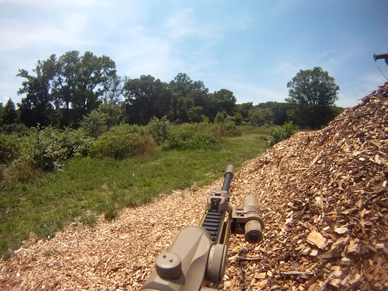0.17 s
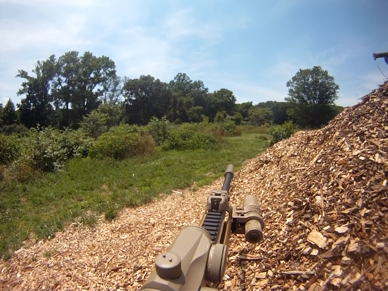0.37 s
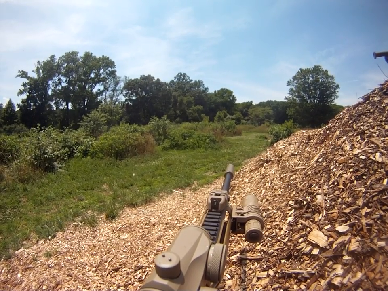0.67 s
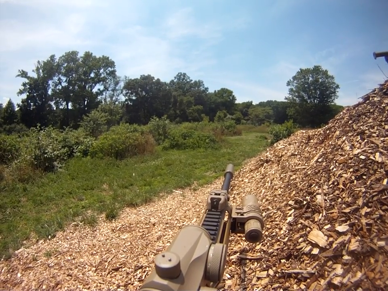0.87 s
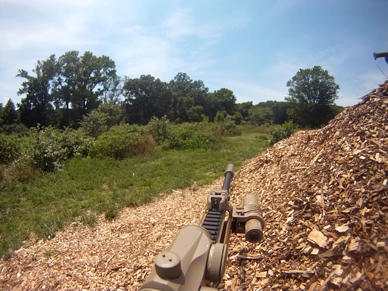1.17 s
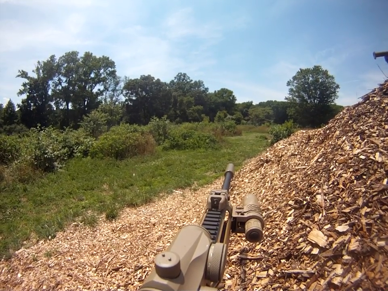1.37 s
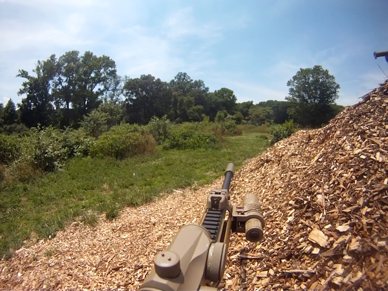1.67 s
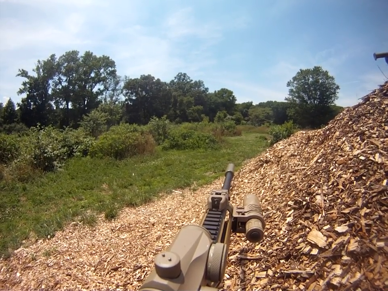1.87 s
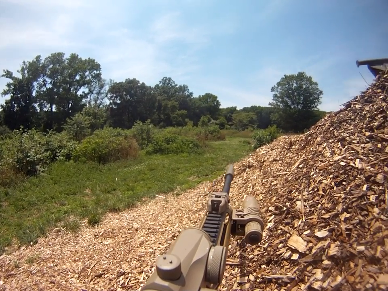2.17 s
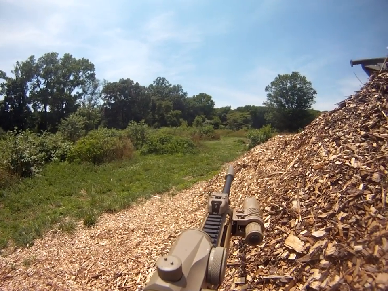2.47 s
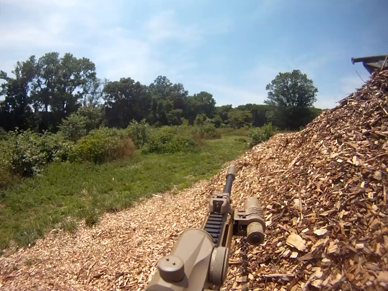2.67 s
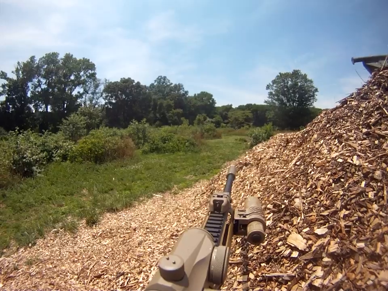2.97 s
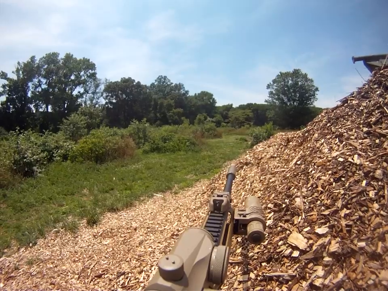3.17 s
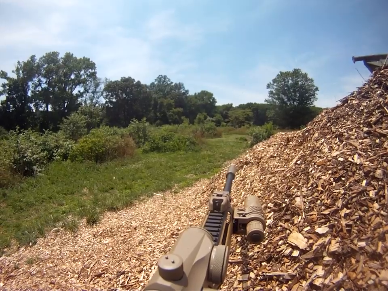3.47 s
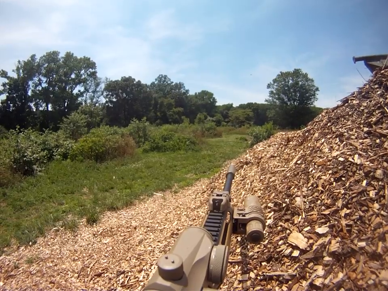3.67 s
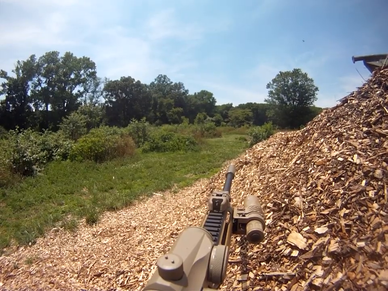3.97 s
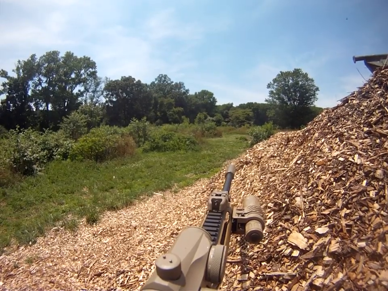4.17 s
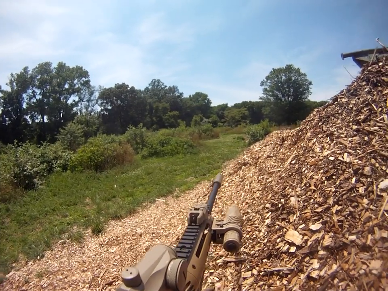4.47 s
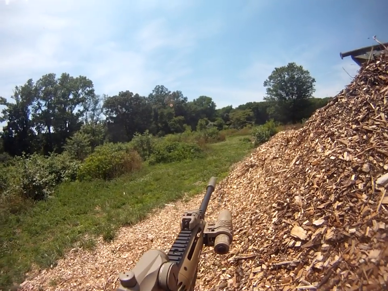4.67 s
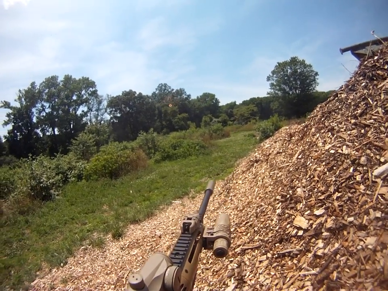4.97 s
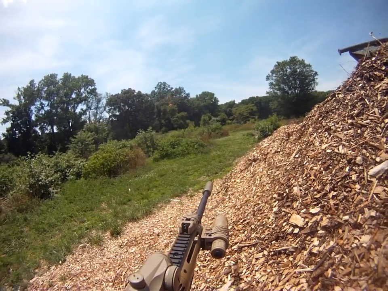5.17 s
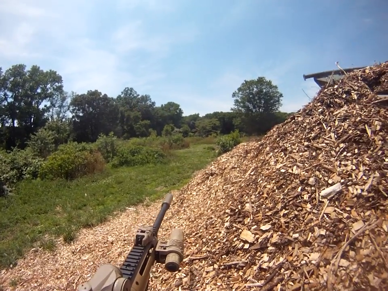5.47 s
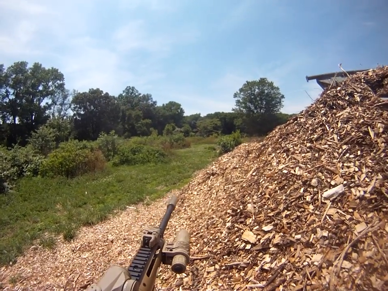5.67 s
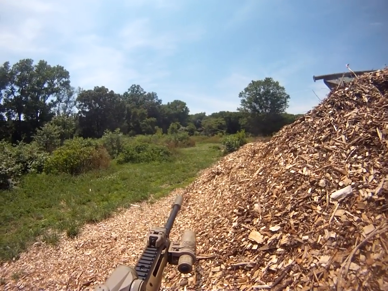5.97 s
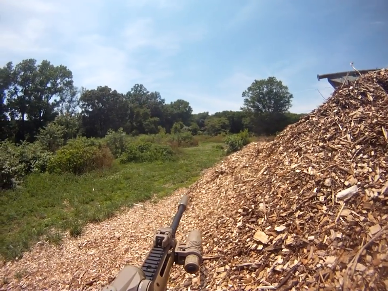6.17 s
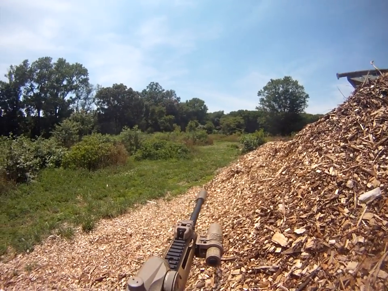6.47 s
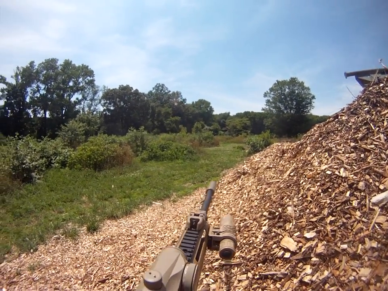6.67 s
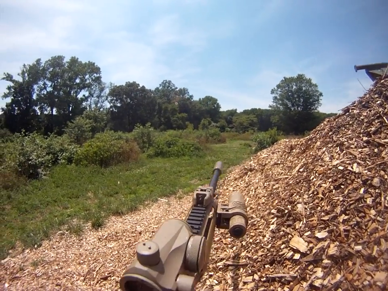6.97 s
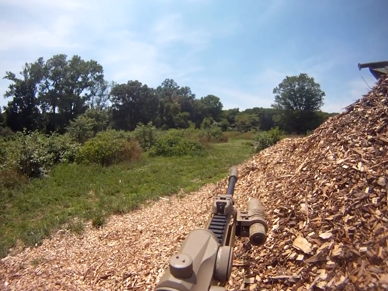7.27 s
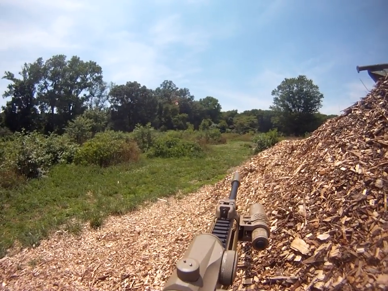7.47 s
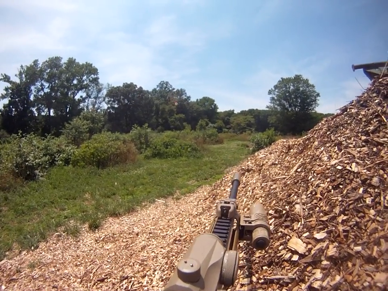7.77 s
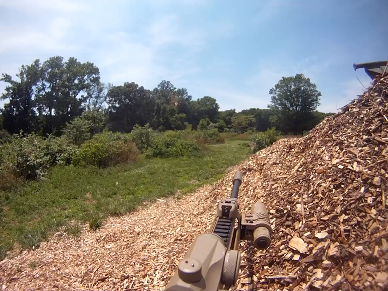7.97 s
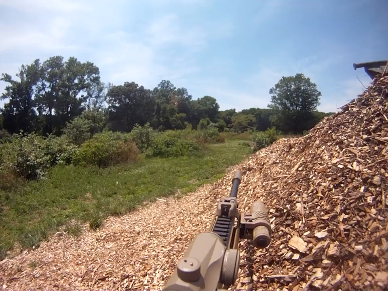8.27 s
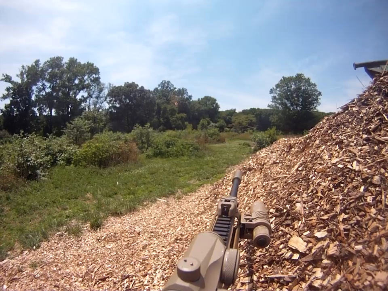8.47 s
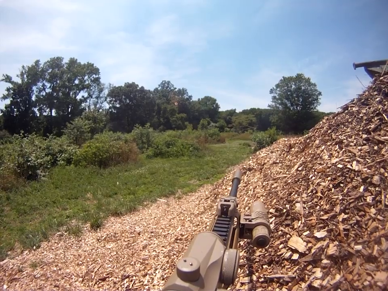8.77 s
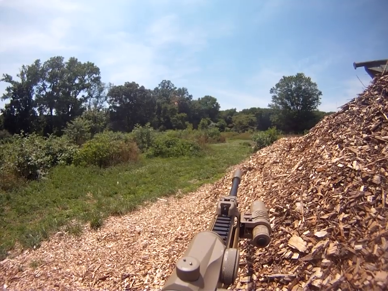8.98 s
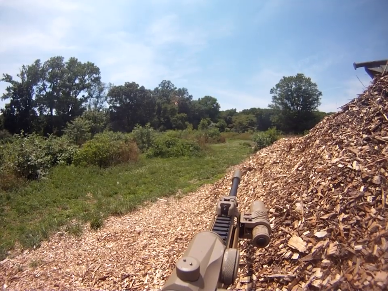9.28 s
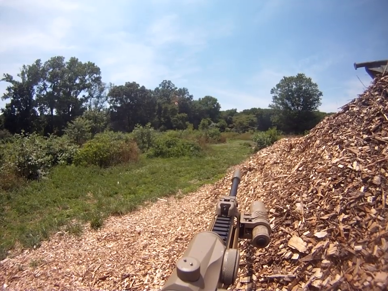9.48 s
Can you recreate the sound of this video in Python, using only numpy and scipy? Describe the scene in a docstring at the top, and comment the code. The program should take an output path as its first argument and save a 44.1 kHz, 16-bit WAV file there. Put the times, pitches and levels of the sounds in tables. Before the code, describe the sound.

Outdoors in a field beside a wood-chip bank, a microphone mounted on an airsoft rifle catches its loud, metallic three-shot bursts, very close and dry. Small clicks and a faint bird fill the gaps. Midway, another gun snaps in a long slowing burst while a farther one pops rapidly; later two nearby guns whirr and rattle one after the other, overlapped by more rifle bursts.

```python
"""An airsoft rifle with a camera on its rail fires short bursts over a field, 19 shots a second.
Each shot is a gearbox cycle: ringing modes and scraping noise, a slam pulse and a softer recoil bump.
Other guns, built from coloured noise puffs and rings, fire long bursts; two of them whirr close by.
Clicks, dull knocks and faint echoes join them over low air rumble, a background noise whose level
rises and falls, and a bird of swept sine notes."""
import sys
import numpy as np
from scipy import signal
from scipy.fft import rfft, irfft, next_fast_len
from scipy.io import wavfile
from scipy.ndimage import map_coordinates

SR = 44100
rng = np.random.default_rng(int(sys.argv[2]) if len(sys.argv) > 2 else 0)


def bounce(signal):
    """Save signal as a 16-bit WAV file at the path given by the first command-line argument."""
    frames = np.transpose(np.atleast_2d(signal))
    limited = np.clip(frames, -1, 1)
    pcm = np.round(limited * 32767).astype(np.int16)
    wavfile.write(sys.argv[1], SR, pcm)


N = 423801
BLOW_T = np.arange(SR // 16) / SR  # time within one blow, s

# Colour of a dull knock, also of a shuddering shell: f/Hz, relative level/dB
KNOCK_COLOUR = [(60, -18), (250, -8), (380, -1.5), (560, -2.5), (800, -13.5), (3000, -29.5)]
# Colour of a close gun's pop: f/Hz, relative level/dB
NEAR_POP_COLOUR = [(40, -19), (120, 0.5), (350, -10), (600, -2.5), (1000, -1), (1350, -3), (1600, -9),
                   (2400, -4), (3200, 1), (3800, -16), (6000, -22.5)]
# Colour of gear noise and latch clicks: f/Hz, relative level/dB
GEAR_COLOUR = [(100, -17), (300, -14.5), (600, -12), (900, -11), (1450, -12.5), (1950, -3), (2400, -3),
               (2700, -5), (3150, 2.5), (3800, -8), (4400, -10), (5100, -5.5), (5900, -14), (8000, -28)]


def amp(db):
    """Decibels to gain."""
    return 10 ** (np.asarray(db) / 20)


def unit(x):
    """Scale to rms 1."""
    return x / np.sqrt(np.mean(x ** 2) + 1e-20)


def gain(points, hz):
    """Gain at hz, drawn through (f/Hz, level/dB) points on a log frequency axis."""
    f, db = np.transpose(points)
    return amp(np.interp(np.log(hz + 1), np.log(f), db))


def wobble(rate):
    """A smooth random curve with rate knots a second."""
    knots = rng.standard_normal(int(N * rate / SR) + 4)
    return map_coordinates(knots, [np.arange(N) * rate / SR])


def filtered(x, response):
    """Filter x with a response given as a function of frequency."""
    size = next_fast_len(len(x) + SR // 4)
    spectrum = rfft(x, size) * response(np.fft.rfftfreq(size, 1 / SR))
    return irfft(spectrum, size)[:len(x)]


def noise(colour):
    """Steady coloured noise of rms 1."""
    return unit(filtered(rng.standard_normal(N), lambda hz: gain(colour, hz)))


def pulse(colour, size=2048):
    """A minimum-phase pulse of this colour: it starts at once and peaks at 1."""
    cepstrum = irfft(np.log(gain(colour, np.fft.rfftfreq(size, 1 / SR))))
    # Folding the cepstrum forward in time makes the pulse causal
    fold = np.r_[1, np.full(size // 2 - 1, 2), 1, np.zeros(size // 2 - 1)]
    shape = irfft(np.exp(rfft(cepstrum * fold)))
    return shape / np.abs(shape).max()


def ring(modes):
    """Damped sine modes of a struck body, one a row."""
    hz, db, t60 = np.transpose(modes)[:, :, None]
    return amp(db - 60 * BLOW_T / t60) * np.sin(2 * np.pi * hz * BLOW_T)


def struck(modes, count, scatter_db):
    """Sum the modes at new random strengths for every blow, one blow a row."""
    strengths = amp(scatter_db * rng.standard_normal((count, len(modes))))
    return strengths @ modes


def puffs(colour, t60, count, alike):
    """Dying noise bursts that start near rms 1, one a row; the share alike repeats in each."""
    fade = amp(-60 * BLOW_T / t60)
    white = rng.standard_normal((count + 1, len(BLOW_T)))
    white = np.sqrt(alike) * white[0] + np.sqrt(1 - alike) * white[1:]
    bursts = signal.fftconvolve(white * fade, colour[None], axes=1)[:, :len(BLOW_T)]
    return bursts * np.linalg.norm(fade) / np.linalg.norm(bursts, axis=1, keepdims=True)


def add(track, s, sound):
    """Mix a sound into the track at time s; it may begin before the track does."""
    start = round(s * SR)
    sound = sound[max(-start, 0):]
    part = track[max(start, 0):][:len(sound)]
    part += sound[:len(part)]


def noise_hits(events, colour, contacts):
    """Each event is a few quick contacts, each a dying puff of noise in the given colour."""
    out, shape = np.zeros(N), pulse(colour)
    for delay, contact_db, t60 in contacts:  # t/s, level/dB, t60/s
        hits = puffs(shape, t60, len(events), alike=0.42)
        for (s, db), hit in zip(events, hits):
            add(out, s + delay, amp(db + contact_db) * hit)
    return out


def burst(first, period, db, spin_up_s, count):
    """Shot times and levels: a motor's starting lag shrinks until the pace is even."""
    lag_left = .19  # share of the lag still to come after each shot
    scatter_db = .7  # shots are unequally loud
    k = np.arange(count)
    times = first + period * k + spin_up_s * (1 - lag_left ** k)
    return times, db + scatter_db * rng.standard_normal(count)


def gears(times, lead_s, run_on_s, db):
    """Gritty gear noise that rises with a burst, labours once a shot and coasts down after it."""
    rise_db_per_s, fall_db_per_s = 230, 220
    load_db, hardest_at = 1.6, .72  # swing each way; share of the cycle where the load peaks
    t = np.arange(N) / SR
    early = np.maximum(times[0] - lead_s - t, 0)
    late = np.maximum(t - times[-1] - run_on_s, 0)
    cycle = np.interp(t, times, np.arange(len(times)))
    load = np.cos(2 * np.pi * (cycle - hardest_at))  # gears labour as the spring winds
    level_db = db + load_db * load - rise_db_per_s * early - fall_db_per_s * late
    grit_db = 1.3 * wobble(170) + 1.4 * wobble(700)
    return amp(level_db + grit_db) * noise(GEAR_COLOUR)


def rifle():
    """The piston clatters through the receiver, slams home, and the gun bumps while its spring rings."""
    # Trigger pulls: start of the first stroke t/s, delay of the first slam t/s
    pulls = [(-.031, .0078), (.7141, .0077), (1.2128, .0076), (2.5947, .0026), (3.3969, .0078),
             (7.823, .0027), (8.6012, .0076), (9.586, .0076)]
    # Contacts of one cycle: nominal t/ms after the stroke starts, receiver level/dB, spring level/dB,
    # scrape level/dB before its trim, scrape t60/ms
    cycle = [(-3, -9, -20.5, -12.5, 9), (0, -1.5, -5, 1, 16), (1.91, -5.5, -4, -3, 16),
             (4, -5, -19.5, -5, 6.7), (6.5, -6, -19.5, -6, 36), (11.5, -12, -16.5, -10, 37),
             (20.5, -29, -16, -18, 22), (22.5, -36.5, -14.5, -16.5, 67), (26, -19, -18.5, -15.5, 16),
             (33, -29.5, -13, -15, 84), (34.5, -28.5, -16.5, -18, 60), (39.5, -31, -21, -21.5, 45)]
    # Receiver modes: f/Hz, level/dB, t60/s
    receiver_modes = [(165, -22, 0.057), (224, -14.5, 0.051), (290, -21, 0.026), (426.6, -20, 0.054),
                      (568, -14, 0.063), (860, -14, 0.028), (1243, -15.5, 0.027), (1601, -16.5, 0.02),
                      (1839, -15, 0.02), (2297, -17.5, 0.024)]
    # Spring modes: f/Hz, level/dB, t60/s
    spring_modes = [(2698, -14, 0.023), (2864, -8, 0.023), (2942, -17.5, 0.05), (3170, -22, .02),
                    (3816, -21, 0.013), (4350, -22.5, .02), (5037, -19.5, .025)]
    # Colour of the scraping contacts: f/Hz, relative level/dB
    scrape_colour = [(30, -22.5), (150, -7.5), (600, -3.5), (1500, 1.5), (2600, -4.5), (4000, -4.5),
                     (5500, -10)]
    # Colour of the piston slam: f/Hz, relative level/dB
    slam_colour = [(20, -15.5), (120, -13), (300, -1), (500, 8.5), (750, -6.5), (1300, 0), (1950, 3),
                   (2800, -8), (4500, -15), (9000, -21.5)]
    # Colour of the recoil bump: f/Hz, relative level/dB
    bump_colour = [(20, -20.5), (100, -4.5), (250, -3), (430, 1), (700, -6), (1200, -11.5), (2500, -30.5),
                   (8000, -63.5)]
    cycle_s = .0524  # from shot to shot
    slam_s = .0078  # from stroke to slam once the gearbox is running
    first_db, next_db = 1.4, .45  # a burst opens with its hardest shot
    shots = [(s + k * cycle_s, slam_s if k else first_slam, next_db if k else first_db)
             for s, first_slam in pulls for k in range(3)]
    count, stroke = len(shots), np.transpose(shots)[1]
    receiver, spring = ring(receiver_modes), ring(spring_modes)
    scrape, slam, bump = pulse(scrape_colour), pulse(slam_colour), pulse(bump_colour)
    out = np.zeros(N)
    for ms, receiver_db, spring_db, scrape_db, scrape_ms in cycle:
        blows = amp(receiver_db) * struck(receiver, count, scatter_db=3.0)
        blows += amp(spring_db) * struck(spring, count, scatter_db=2.5)
        blows += amp(scrape_db - 13.0) * puffs(scrape, scrape_ms / 1000, count, alike=0.68)
        blows *= 1 - np.exp(-BLOW_T / 0.00022)  # contact force takes a moment to build
        delays = ms / 1000 * (1 + .015 * rng.standard_normal(count))  # later bounces are less exact
        if 0 < ms / 1000 < 2 * slam_s:  # an early slam crowds the stroke's contacts together
            delays = delays * stroke / slam_s
        for (s, _, db), delay, blow in zip(shots, delays, blows):
            add(out, s + delay, amp(db) * blow)
    for s, slam_delay, db in shots:
        add(out, s + slam_delay, -amp(db + 3) * slam)
        add(out, s + .0257, -amp(db - 12.5) * bump)
    return filtered(out, lambda hz: (1j * hz / (1j * hz + 80)) ** 2)  # a small body radiates little bass


def field():
    """Low air rumble and a background of shaped noise under a level contour, with a bird of swept sines."""
    # Colour of the low air: f/Hz, relative level/dB
    rumble_colour = [(13, -50), (22, -17.5), (36, -10.5), (59, -2), (125, -9), (156, -11), (231, -14),
                     (500, -16.5), (650, -39.5), (1100, -120)]
    # Colour of the field's background noise: f/Hz, relative level/dB
    background_colour = [(150, -6.5), (350, -9), (600, -1), (900, -7), (1600, -8), (2900, -6.5),
                         (4200, -14), (6000, -15)]
    # Contour of the field's background noise (rustle, echo and blurred gun rattle) before its gain:
    # t/s, level/dB
    background_contour = [(0.18, -61), (0.46, -61), (0.76, -59), (0.89, -53), (1.0, -57), (2.14, -62),
                          (2.58, -62), (2.73, -58), (3.08, -60), (4.52, -53), (5.08, -53), (5.38, -56),
                          (6.49, -63), (6.9, -63)]
    # Brief rises of the background noise: middle t/s, rise level/dB
    swells = [(.52, 4), (.975, 4.5), (5.81, 5)]
    # Bird notes: t/s, length t/s, start f/Hz, end f/Hz
    bird_notes = [(2.205, .08, 4100, 5100), (2.49, .08, 4280, 5000), (2.92, .055, 5200, 4250),
                  (3.245, .045, 4900, 3900), (3.305, .05, 4000, 4600), (9.253, .14, 3480, 3780)]
    rumble_db, background_gain_db, bird_db = -57, 2.2, -64
    swell_s = .07  # from a rise's middle to 1/e of its height in dB
    t = np.arange(N) / SR
    background_db = np.interp(t, *np.transpose(background_contour)) + background_gain_db
    swell_db = sum(db * np.exp(-((t - s) / swell_s) ** 2) for s, db in swells)
    out = amp(rumble_db + 1.2 * wobble(10)) * noise(rumble_colour)
    out += amp(background_db + swell_db + .7 * wobble(25)) * noise(background_colour)
    for s, length, start_hz, end_hz in bird_notes:
        sweep = np.linspace(start_hz > end_hz, end_hz > start_hz, int(length * SR))
        height = sweep ** 1.6  # lingers at the low end, sweeps fast at the top
        pitch = min(start_hz, end_hz) + abs(end_hz - start_hz) * height
        tone = np.sin(2 * np.pi * np.cumsum(pitch) / SR)
        add(out, s, amp(bird_db) * np.hanning(len(pitch)) * tone)
    return out


def clicks():
    """Short hard clicks: a quick puff of bright noise, then a brief weak rattle."""
    # Clicks nearby: t/s, level/dB before the contact levels
    click_events = [(.2224, -42), (.2666, -40), (1.4777, -40), (2.0873, -39), (3.0833, -35), (3.8424, -30),
                    (6.0882, -36.5), (6.2348, -24), (8.933, -21), (8.974, -30)]
    # Colour of a click: f/Hz, relative level/dB
    click_colour = [(300, -20), (1000, -19), (1500, -9), (2400, -10), (3000, 1), (3800, -22), (5100, -13),
                    (7000, -26)]
    return noise_hits(click_events, click_colour, [(.001, -7, .012), (.004, -24, .05)])


def snapping_gun():
    """Bright noise snaps with a ringing ping: single shots, and a long burst that tires and slows."""
    # Long burst: first shot t/s, period t/s before slowing, level/dB before contacts, starting lag t/s
    snap_burst = (3.8072, .1096, -24.3, 0)
    # Single snaps: t/s, level/dB before the contact levels
    single_snaps = [(1.047, -33), (1.5539, -36), (3.6812, -25), (3.7344, -33.5)]
    # Colour of the snap: f/Hz, relative level/dB
    snap_colour = [(100, -16), (600, -19), (1000, -23), (1600, -15.5), (2100, -9), (2600, -3), (2950, -14),
                   (3800, -27), (5100, -18), (7000, -25.5)]
    # Modes of the ping: f/Hz, level/dB, t60/s
    ping_modes = [(2590, -13.5, .02), (2720, -20, .025)]
    tires_after, slowing_s = 2.39, .00135  # shots; delay per squared shot since it tired
    times, levels = burst(*snap_burst, count=14)
    tired = np.maximum(np.arange(len(times)) - tires_after, 0)
    times = times + slowing_s * tired ** 2
    shots = [*zip(times, levels), *single_snaps]
    out = noise_hits(shots, snap_colour, [(0, -6.5, 0.0087), (.0015, -10, 0.011), (.004, -28, .06)])
    pings = struck(ring(ping_modes), len(shots), scatter_db=1.5)
    for (s, db), ping in zip(shots, pings):
        add(out, s + .001, amp(db) * ping)
    return out


def far_guns():
    """Noise puffs across the field: lead-in tick, pop and short rattle a shot, and a few dull knocks."""
    # Long burst: first shot t/s, period t/s, level/dB before contacts, starting lag t/s
    far_burst = (4.2744, .06664, -31.2, 0)
    # Stray pops: t/s, level/dB before the contact levels
    single_pops = [(4.019, -31.5), (4.181, -29), (4.901, -33.5), (5.071, -29), (5.295, -28.5)]
    # Colour of a far pop: f/Hz, relative level/dB
    pop_colour = [(170, -4), (330, -8), (580, 3.5), (790, -3), (930, 0), (1150, -13), (1500, -5),
                  (2000, -3), (2850, -8), (3500, -16), (6000, -19)]
    # Dull knocks: t/s, level/dB before the contact levels
    knock_events = [(3.77, -49), (3.8, -47), (4.018, -41)]
    shots = [*zip(*burst(*far_burst, count=15)), *single_pops]
    pops = noise_hits(shots, pop_colour, [(-.005, -15, 0.041), (.001, -4.5, 0.022), (.004, -20.5, .08)])
    return pops + noise_hits(knock_events, KNOCK_COLOUR, [(0, 0, 0.051), (.01, -2, 0.057)])


def near_gun():
    """An automatic gun gathers speed: each shot thumps, cracks, rings and ticks over its gears."""
    # Long burst: first shot t/s, settled period t/s, level/dB before fade and contacts, starting lag t/s
    near_burst = (6.9695, .06247, -23, .0253)
    # Gears: full level t/s before the first shot (negative: after), run-on t/s after the last, level/dB
    gear_run = (-.035, .05, -51.2)
    # Mode of the body thump: f/Hz, level/dB, t60/s
    body_modes = [(125, -38.5, 0.04)]
    # Modes of the shell: f/Hz, level/dB, t60/s
    shell_modes = [(985, -21, .028), (3200, -13, .028)]
    fade_db_per_s = 2.0  # it weakens over the burst
    times, levels = burst(*near_burst, count=12)
    shots = list(zip(times, levels - fade_db_per_s * (times - times[0])))
    out = noise_hits(shots, NEAR_POP_COLOUR,
                     [(.002, -9, .01), (.003, -18, .04), (.018, -20, .025), (.0522, -18.5, .03)])
    thumps = struck(ring(body_modes), len(shots), scatter_db=2.0)
    pings = struck(ring(shell_modes), len(shots), scatter_db=1.5)
    crack = pulse(NEAR_POP_COLOUR)
    for (s, db), thump, ping in zip(shots, thumps, pings):
        add(out, s - .0025, -thump)
        add(out, s + .0017, amp(db - 5) * crack)
        add(out, s + .0015, amp(db) * ping)
    return out + gears(times, *gear_run)


def neighbour():
    """Gears grind while a close gun cycles: a dull thud, a spit of air, then the latch clicks."""
    # Long burst: first shot t/s, settled period t/s, level/dB before contacts, starting lag t/s
    close_burst = (7.7453, .0744, -26, .01)
    # Gears: full level t/s before the first shot (negative: after), run-on t/s after the last, level/dB
    gear_run = (-.008, .008, -37.5)
    # Modes of the gun's body: f/Hz, level/dB, t60/s
    thud_modes = [(150, -3.5, 0.024), (296, -7, .02), (455, -3, 0.022)]
    times, levels = burst(*close_burst, count=16)
    shots = list(zip(times, levels))
    out = gears(times, *gear_run)
    thuds = struck(ring(thud_modes), len(shots), scatter_db=1.0)
    for (s, db), thud in zip(shots, thuds):
        soft = thud * (1 - np.exp(-BLOW_T / 0.0015))
        landing = .0135 + .0003 * rng.standard_normal()
        add(out, s + 0.00689, -amp(db + 4.0) * soft)  # the piston is let go
        add(out, s + landing, -amp(db - 2.5) * soft)  # and lands on its cushion
    out += noise_hits(shots, KNOCK_COLOUR, [(.008, -8.5, .03)])  # the shell shudders
    out += noise_hits(shots, NEAR_POP_COLOUR, [(.013, -5, .015)])  # the spit of air
    # A bright edge on the air, then the latch
    return out + noise_hits(shots, GEAR_COLOUR, [(.013, -1.5, .018), (.0338, 1.5, 0.011), (.047, -8, .03)])


def echoes(x):
    """The bank and the vegetation scatter back a weak, diffuse answer, tilted towards the treble."""
    # Wood-chip bank, bushes, trees: delay t/s, level/dB before colouring, t60/s
    reflectors = [(.025, -26, .2), (.135, -42.5, .2), (0.221, -48, .25)]
    colour = [(150, -13), (600, -8.5), (1500, -6), (3000, -0.5), (12000, 2.5)]  # f/Hz, gain/dB
    t, answer = np.arange(SR // 2) / SR, np.zeros(SR)
    for delay, db, t60 in reflectors:
        envelope = amp(-60 * t / t60) * (1 - np.exp(-t / .008))
        tail = rng.standard_normal(len(t)) * envelope
        add(answer, delay, amp(db) * tail / np.linalg.norm(tail))
    scattered = signal.fftconvolve(x, answer)[:N]
    return filtered(scattered, lambda hz: gain(colour, hz))


def scene():
    """All guns, knocks and clicks, their echoes and the field, in mono."""
    guns = rifle() + clicks() + snapping_gun() + far_guns() + near_gun() + neighbour()
    return (guns + echoes(guns) + field())[None]


def record(dry):
    """The camera clips and holds samples at a low rate: the steps mirror the sound into the treble."""
    hold_hz, band_hz, top_hz = 12000, 5600, 15450  # hold rate; cutoffs before and after it
    narrow = filtered(dry[0], lambda hz: 1 / np.sqrt(1 + (hz / band_hz) ** 50))
    clipped = np.clip(narrow, -1, 1)
    # Only the first pair of mirror images around the hold rate is made
    mirrored = clipped * (1 + 2 * np.cos(2 * np.pi * hold_hz * np.arange(N) / SR))
    # The sinc is the treble loss of holding each sample
    return filtered(mirrored, lambda hz: np.sinc(hz / hold_hz) / np.sqrt(1 + (hz / top_hz) ** 160))[None]


dry = scene()
out = record(dry)
bounce(out)
```